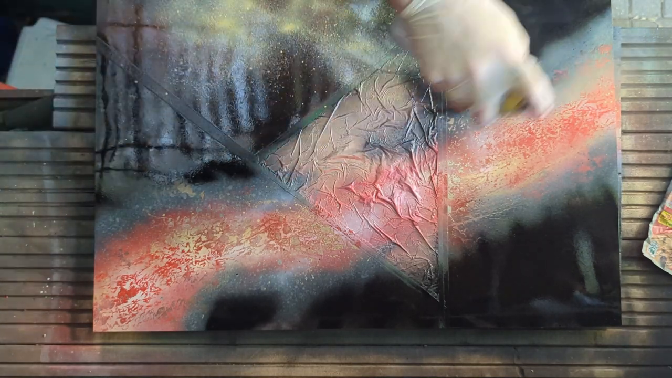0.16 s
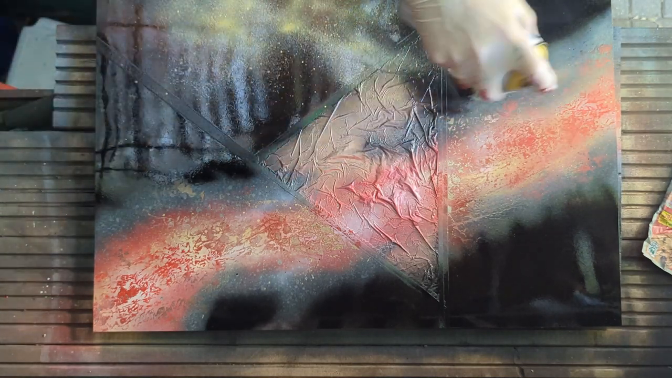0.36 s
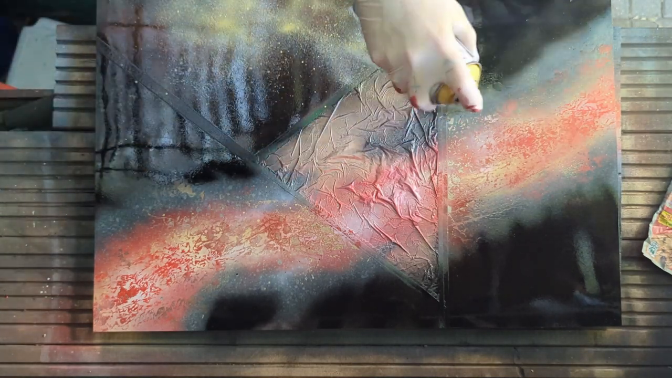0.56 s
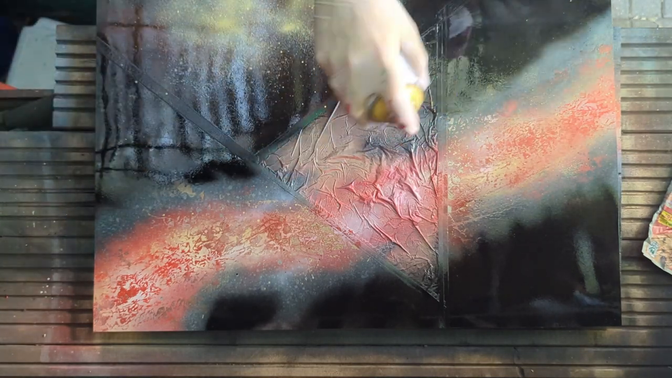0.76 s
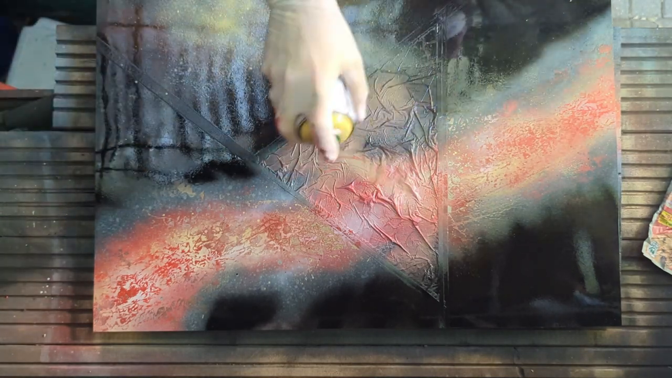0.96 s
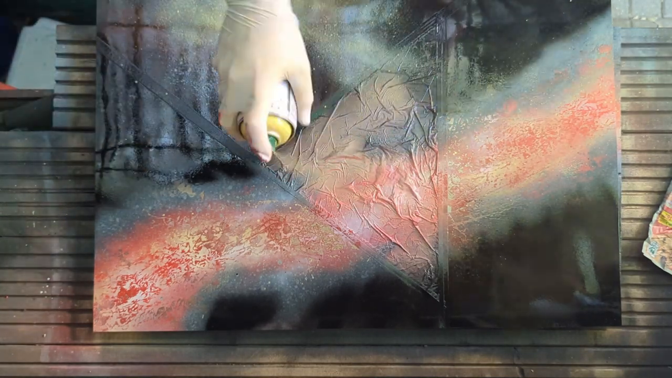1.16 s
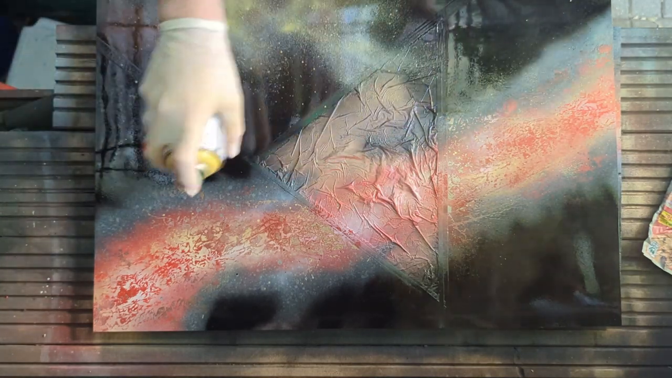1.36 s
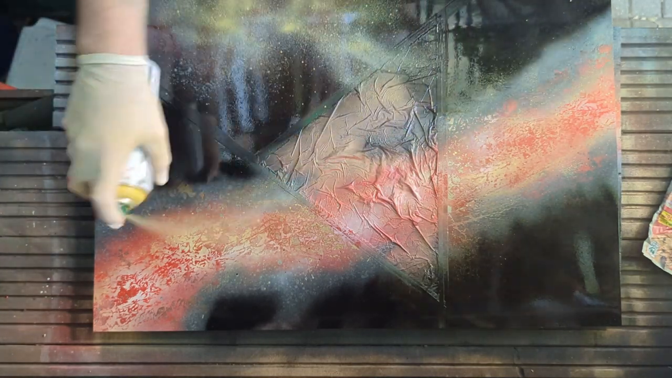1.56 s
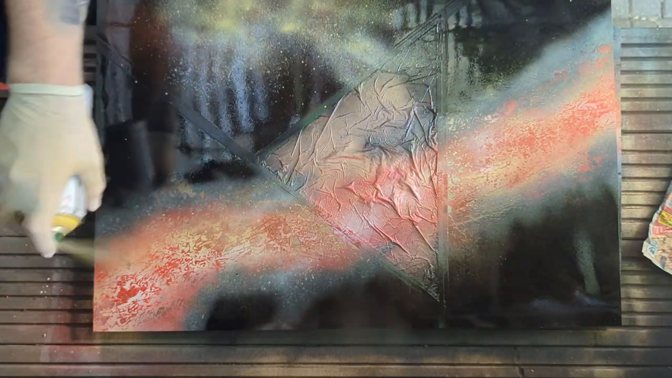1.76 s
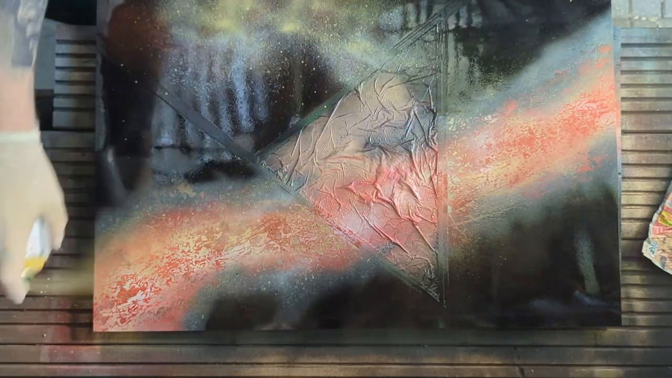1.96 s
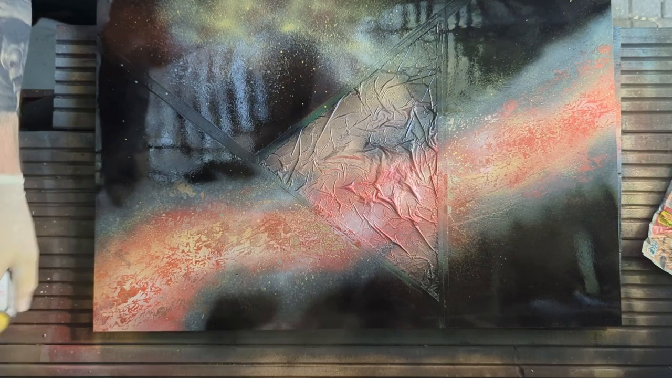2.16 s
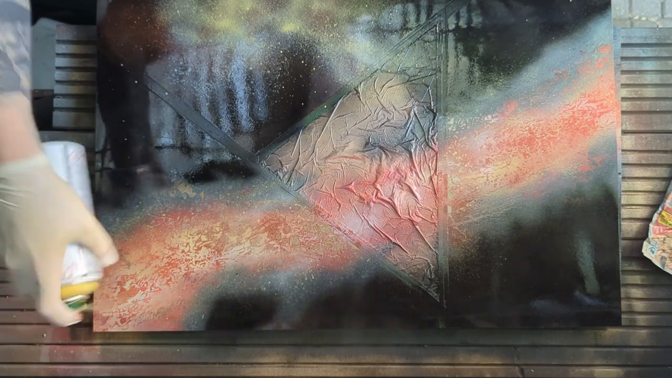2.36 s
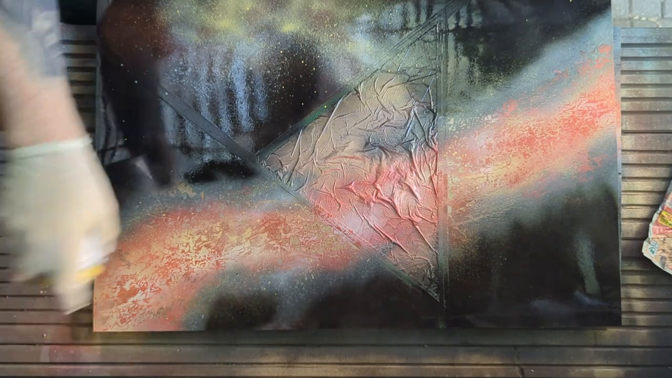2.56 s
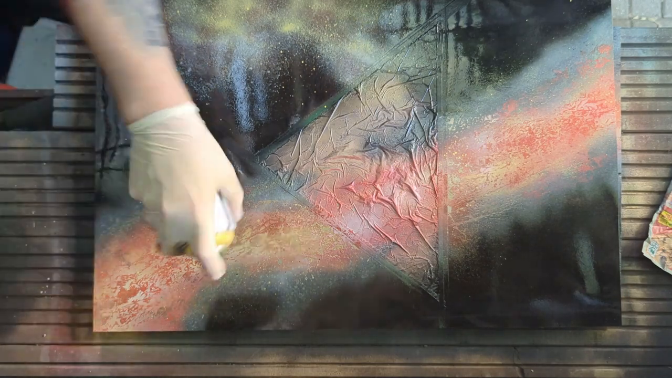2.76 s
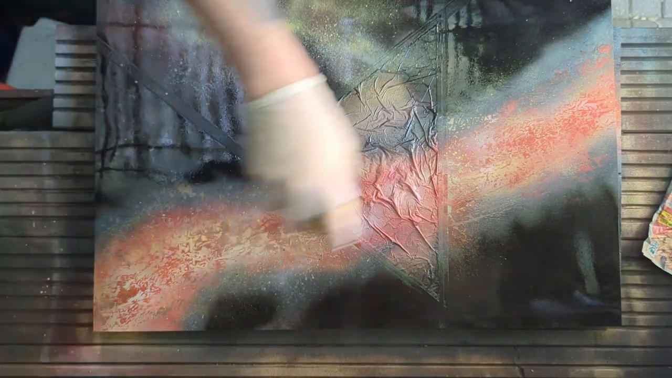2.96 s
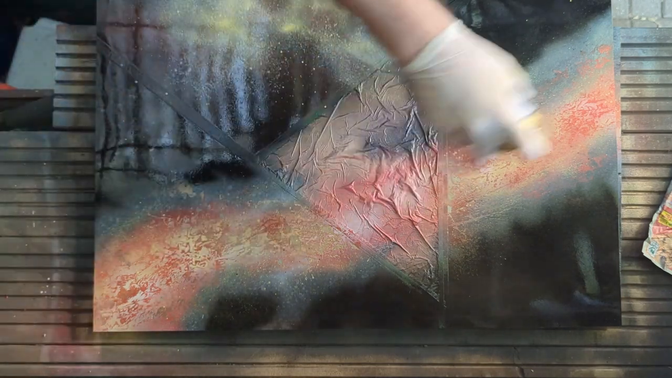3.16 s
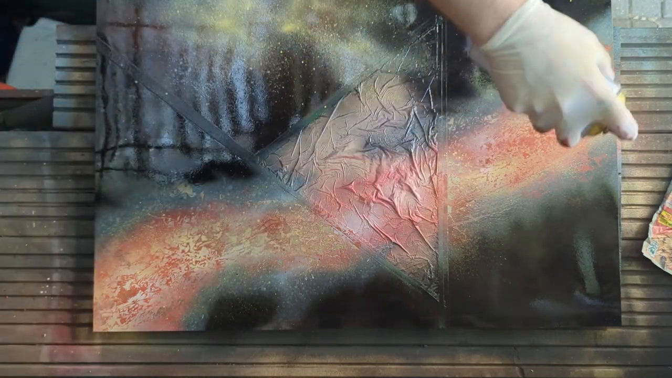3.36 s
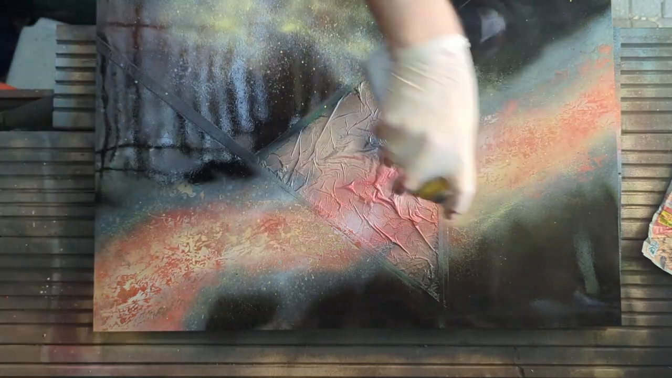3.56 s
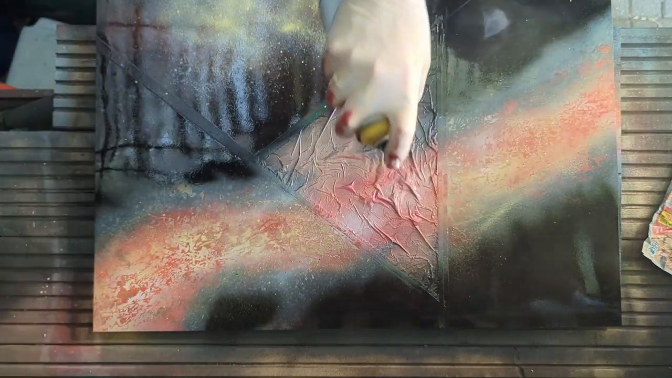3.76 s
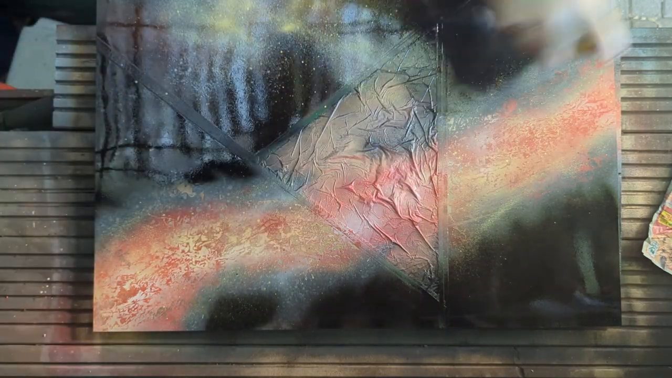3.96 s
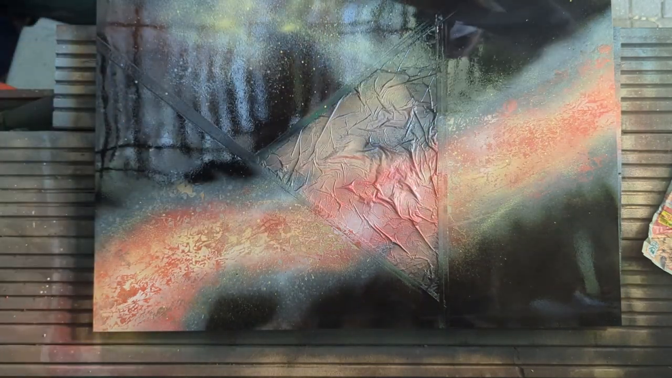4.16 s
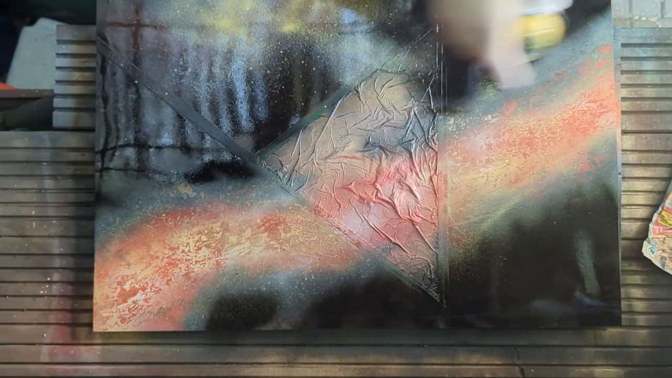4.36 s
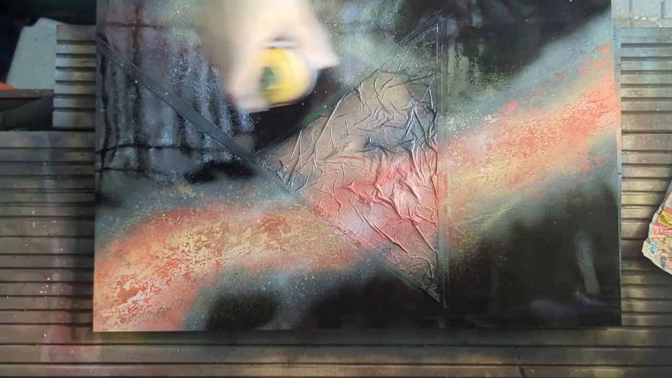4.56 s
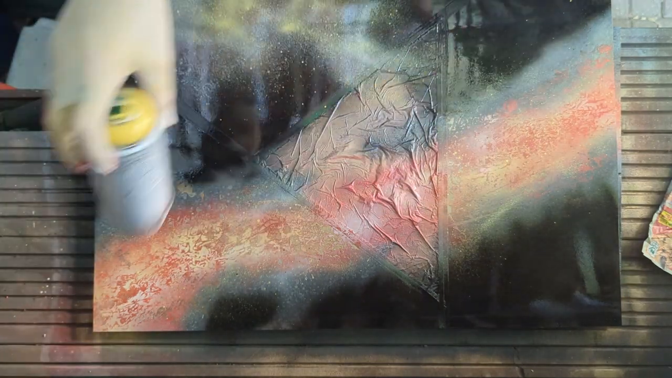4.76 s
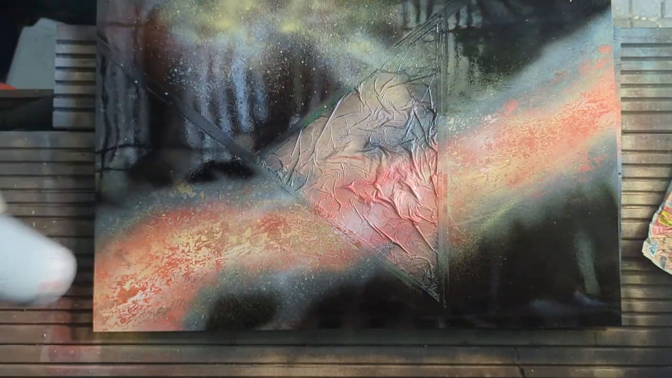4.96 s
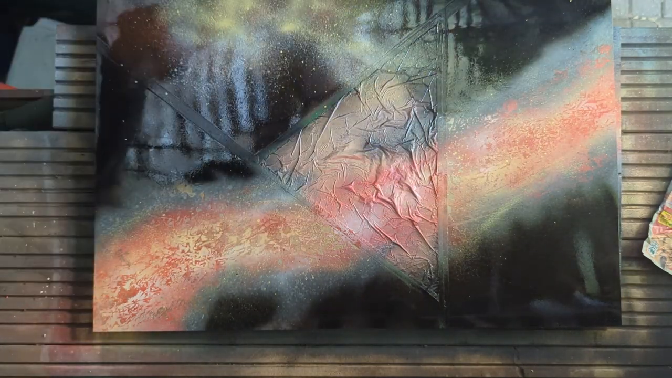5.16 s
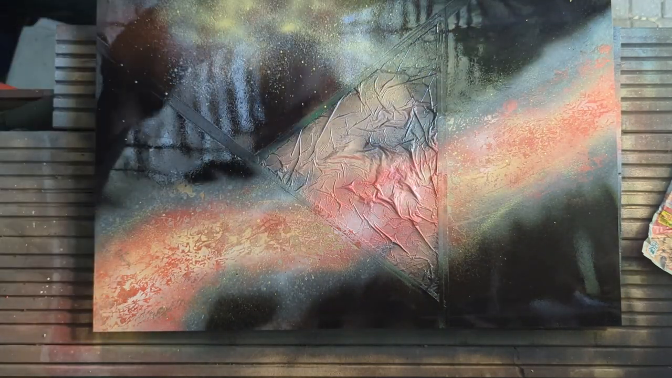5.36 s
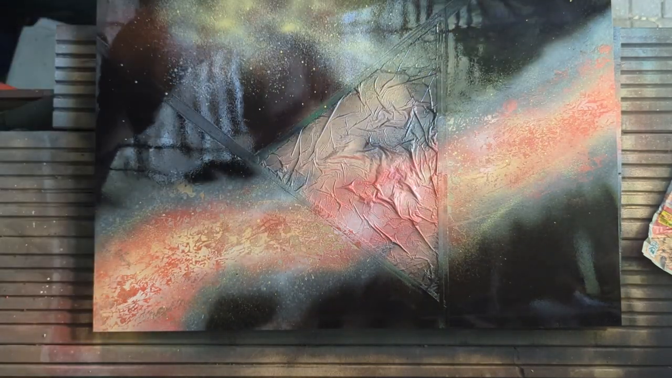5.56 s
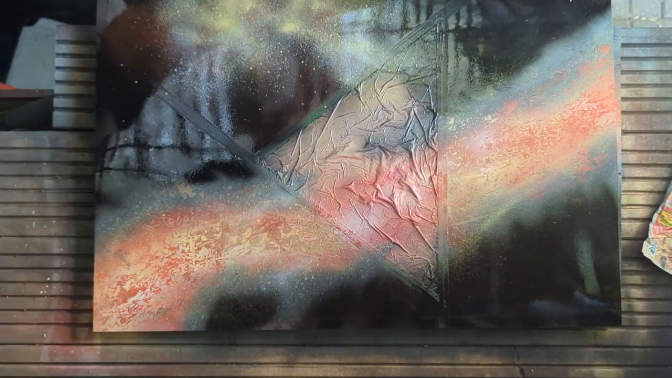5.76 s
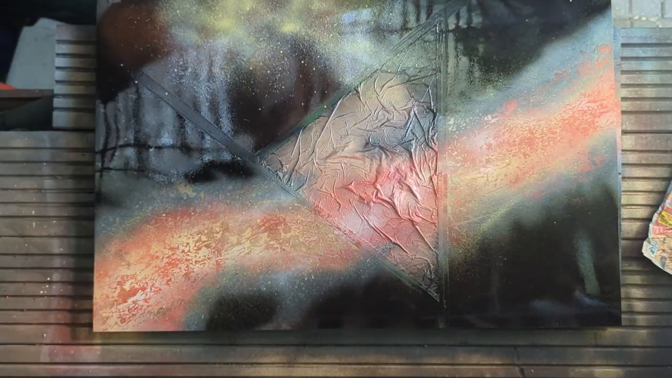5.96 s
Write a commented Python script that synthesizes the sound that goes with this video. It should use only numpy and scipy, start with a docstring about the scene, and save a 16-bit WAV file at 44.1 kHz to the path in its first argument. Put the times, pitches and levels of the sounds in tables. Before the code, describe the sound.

A spray can hisses in short rhythmic bursts over a canvas while its ball rattles, then quiet handling, ending in loud knocks and scraping on wood.

```python
"""A hand sweeps a paint can over a canvas in a small studio, over a steady lumpy rumble of coloured noise.
First come short nozzle bursts of grainy jet noise, while the mixing ball rattles and taps modes of the can.
Then the ball rolls in a gliding resonance, jolts of the can hiss, and cloth rubs and snaps in soft noise.
Last, things drag on the wooden table in wood noise, grit and squeaks, and modal knocks drive it into clipping.
Two soft falling-pitch bumps lie below, one in the spraying and one among the knocks."""
import sys
import numpy as np
from scipy import signal
from scipy.fft import rfft, irfft
from scipy.io import wavfile
from scipy.ndimage import uniform_filter1d, map_coordinates

SR = 44100
rng = np.random.default_rng(int(sys.argv[2]) if len(sys.argv) > 2 else 0)


def wrap_up_sound(samples):
    """Save the sound to the file named by the first command line argument, as 16-bit audio."""
    columns = np.atleast_2d(samples).T
    # keep every value between -1 and 1, then stretch to whole-number steps
    tamed = np.clip(columns, -1, 1)
    steps = np.round(tamed * 32767).astype(np.int16)
    wavfile.write(sys.argv[1], SR, steps)


N = 264600

# Room rumble and hiss. Each row: frequency in Hz, relative density in dB per Hz.
HUM_SPECTRUM = [(12, -56), (20, -35), (47, -7), (68, -5), (93, -6.5), (129, -16), (232, -34), (299, -26),
                (373, -39), (479, -26.5), (536, -36), (2100, -32), (11800, -43.5), (14400, -40),
                (15600, -77)]
# Path of the rumble's low part. Each row: time in seconds, level in dB.
RUMBLE_SWELL = [(0, -41.5), (.99, -42.5), (1.46, -48), (1.55, -42.5), (1.65, -46), (2.32, -49.5),
                (2.75, -45), (2.88, -50), (3.0, -48), (3.45, -46.5), (3.61, -42), (4.0, -46.5), (4.23, -42),
                (4.51, -48), (5.01, -41), (5.14, -49.5), (5.22, -41), (5.45, -51.5)]
# Likeness of left and right. Each row: frequency in Hz, likeness (clipped to 0-1 in use).
LIKENESS = [(60, 0.97), (240, 0.94), (950, 0.08), (3770, -2.2), (15000, -0.04)]
# Reverberation. Each row: frequency in Hz, t60 in seconds.
ROOM_DECAY = [(200, 0.26), (500, 0.13), (1000, 0.15), (4000, 0.19), (12000, 0.18)]
# Where the can is. Each row: time in seconds, lead of the left port in ms, left-right level in dB.
PLACE = [(0, -0.032, -2), (.75, 0.03, -1), (1.25, 0.085, -1), (1.75, 0.2, 0), (2.3, 0.25, 0),
         (2.6, 0.18, 0), (2.9, 0.15, -1), (3.251, -0.088, -1.3), (3.75, -0.07, -0.5), (4.1, -0.05, -2.5),
         (4.751, -0.057, 0), (5.1, 0.37, 2), (5.55, 0.32, 1.5), (5.7, 0.25, 1), (6, 0.13, 3.5)]
# Soft low bumps. Each row: start in seconds, relative level at the onset in dB.
BUMPS = [(2.713, -22), (5.647, -8.5)]
# Cloth rubs and the hiss after jolts of the can. Each row: start, rise and hold in seconds,
# relative level in dB, drift over the hold in dB, brightness 0-1, whistle in dB against the soft noise.
RUBS_AND_JOLTS = [(3.66, 0.055, 0.27, -50, 0.5, 0.1, -40), (3.96, 0.018, 0.064, -23.5, -21, 0.47, -40),
                  (4.05, .01, 0.09, -34.5, -14, .1, -40), (4.17, .01, .07, -54, 1, 0, -40),
                  (4.244, 0.011, .04, -31.5, -13, 0.57, -40), (4.29, .01, .1, -42, -3.5, .4, -40),
                  (4.396, .01, 0.075, -35.5, -11, 0.2, -40), (4.486, 0.01, 0.03, -42, -13, 0.9, -40),
                  (4.53, .01, 0.16, -50.5, -2.5, 0.16, -40), (4.72, 0.06, .16, -41.5, -6, 0.23, -4),
                  (5.14, 0.082, .01, -42, -4, 0.1, -3)]
# Noise of the rubs and jolts before its tilt. Each row: frequency in Hz, relative density in dB per Hz.
SOFT_SPECTRUM = [(350, -58), (600, -24), (1120, -12.5), (1460, -9), (1580, -11), (1760, -2.5), (3630, -8),
                 (4770, -9), (6010, -7.5), (6620, -4.5), (15600, -18.5)]
# The ball rolls along the wall. Each row: start, rise and hold in seconds, relative level in dB,
# drift over the hold in dB, singing pitch in Hz, climb in Hz per second.
ROLLS = [(3.28, 0.019, 0.12, -33, -14, 1390, 0), (4.03, .026, 0.1, -28, -12, 1460, 1500),
         (4.25, 0.011, 0.13, -40, -1, 1450, 1300), (4.394, 0.0092, 0.042, -28.5, -15, 1630, 0),
         (4.47, .01, 0.25, -48, -3, 1330, -200)]
# Slides on the table. Each row: start, rise and hold in seconds, relative level in dB,
# drift over the hold in dB, gain of the gritty treble in dB.
DRAGS = [(5.459, 0.0058, 0.067, -21, 2.5, -11), (5.56, 0.0086, 0.066, -29, 2.5, -7),
         (5.63, 0.0096, .01, -3, -5, -23), (5.75, 0.017, .005, -22, 6, -24),
         (5.765, 0.013, 0.031, 7, -14.5, -30), (5.817, 0.018, 0.084, -11, -12, -10.5),
         (5.9, 0.021, 0.051, -25, -17, -1.5)]
# Shaken wood. Each row: frequency in Hz, relative density in dB per Hz.
WOOD_SPECTRUM = [(24, -46), (40, -41.5), (162, -27), (233, -25), (343, -16), (512, -12), (600, -33),
                 (821, -13), (912, -5), (1410, -7.5), (1510, -8), (1870, -10), (2600, -21.5), (3380, -57),
                 (5720, -120)]
# Grit under the slide. Each row: frequency in Hz, relative density in dB per Hz.
GRIT_SPECTRUM = [(1240, -22), (2100, 5), (3140, -12), (3590, -6), (3880, -5), (4180, -13), (4360, -5),
                 (7980, -10), (8680, -9), (9840, -16), (11900, -11), (14400, -20), (15600, -37)]
# Short squeaks. Each row: start, rise and hold in seconds, relative level in dB, drift over the hold in dB.
SQUEAKS = [(5.459, 0.0044, 0.017, -20, -4.5), (5.49, 0.0067, .002, -14.5, -3), (5.77, .02, .002, -11, -5),
           (5.8, .01, .075, -29, -5), (5.893, 0.017, 0.0054, -10.5, -5), (5.925, .005, .08, -41, -4)]
# Partials of the squeak. Each row: multiple of its pitch, relative level in dB.
SQUEAK_PARTIALS = [(1, 2), (1.62, -20), (2.38, -16.5)]
# Knocks on the table. Each row: time in seconds, relative peak in dB, favoured mode in Hz,
# relative crack in dB, chatter t60 in seconds.
KNOCKS = [(5.46, -17.5, 350, -15, 0.12), (5.489, -20, 900, -3, 0.13), (5.509, -18.5, 497, -13, 0.094),
          (5.632, -14.5, 1200, -2.5, 0.032), (5.636, 6.5, 500, -24, 0.048), (5.642, 1.5, 506, -25, 0.052),
          (5.653, -11, 490, -10, .05), (5.689, -19.5, 640, -13, .059), (5.768, -9, 430, -22, .07),
          (5.777, 2.5, 410, -23.5, 0.041), (5.794, -4, 500, -15, 0.07), (5.83, 5.5, 555, -31, 0.067),
          (5.842, -2.5, 794, -32, 0.1), (5.86, -1, 376, -27, 0.042), (5.878, -14, 355, -11, 0.08),
          (5.896, -13.5, 400, -6.5, 0.16), (5.928, -13, 556, -31, 0.13)]
# Table-top modes. Each row: frequency in Hz, relative level in dB, t60 in seconds.
TABLE_MODES = [(56, -8, 0.39), (124, -22, 0.08), (170, -5, 0.1), (260, -13, 0.062), (349, -3, 0.1),
               (386, -5.5, 0.091), (463, -8, 0.062), (505.4, 7.5, 0.06), (562, -4, 0.09), (642, -7.5, 0.16),
               (737, -3, 0.087), (810, 1, 0.095), (1033, 14.5, 0.023), (1110, -4, 0.043), (1225, 19, 0.021),
               (1380, -2, 0.055), (1630, 12.5, 0.031)]
# Treble of a sharp contact. Each row: frequency in Hz, relative density in dB per Hz.
CRACK_SPECTRUM = [(880, -31), (1500, -7.5), (3730, -11.5), (4590, -7), (5860, -12.5), (8100, -11),
                  (9110, -17.5), (11800, -8), (15600, -22)]
# The ball strikes the can; the last two rows are small snaps of glove or cloth. Each row: time in seconds,
# relative peak in dB, favoured mode in Hz, relative crack in dB, chatter t60 in seconds.
STRIKES_AND_SNAPS = [(.019, -14.5, 2260, 6.5, 0.077), (.084, -21, 2480, -6, .13),
                     (.108, -18.5, 2770, -5, 0.23), (.214, -12, 1150, -12, 0.067),
                     (.258, -15.5, 2080, 3, 0.09), (.348, -16.5, 2790, -15, .12),
                     (.368, -13.5, 1380, -6, 0.064), (.398, -32.5, 1760, 4, 0.11),
                     (.439, -36, 2450, -3, .12), (.455, -8.5, 1720, -10, 0.12), (.502, -20, 2140, 3, 0.15),
                     (.541, -14.5, 1750, -1.5, .15), (.553, -9, 2100, -7, 0.071),
                     (.562, -16, 1100, -15, 0.089), (.603, -8.5, 2780, -14.5, .09),
                     (.678, -10.5, 1800, 0, 0.066), (.72, -9, 2480, -12, .11), (.767, -6, 1300, -16, .079),
                     (.806, -6, 1250, -19, 0.056), (.829, -17, 1200, -2, 0.078),
                     (.864, -22, 2840, -2, 0.067), (.904, -23.5, 2200, -1, .11), (.96, -6, 977, -11, 0.056),
                     (.967, -10.5, 2320, 0, .1), (1.023, -11, 2480, -12.5, 0.067),
                     (1.085, -28, 1410, -6, .12), (1.105, -19, 2220, -2.5, 0.15),
                     (1.163, -15, 2460, -1.5, 0.14), (1.2, -11, 1700, -1.5, 0.13),
                     (1.258, -14, 1190, -13, 0.064), (1.301, -32, 2440, 3.5, 0.097),
                     (1.367, -14, 1700, 1.5, 0.16), (1.401, -13.5, 2340, 1, 0.12),
                     (1.449, -14.5, 1300, -8.5, 0.073), (1.473, -7.5, 1390, -14, .093),
                     (1.509, -17, 1390, -8, 0.13), (1.589, -13.5, 1120, -9, 0.18),
                     (1.602, -9, 2430, -2.5, 0.18), (1.668, -3, 1200, -11.5, 0.084),
                     (1.762, -7.5, 2380, -13, 0.15), (1.775, -15, 2120, 3.5, 0.094),
                     (1.858, -18.5, 2590, -4, 0.16), (1.863, -5, 1390, -12.5, 0.19),
                     (1.961, -34, 2010, -9, 0.11), (1.994, -4.5, 2700, -12.5, 0.094),
                     (1.999, -7.5, 1000, -20, 0.11), (2.072, -5.5, 1200, -18, 0.11),
                     (2.098, -4.5, 1310, -12.5, .13), (2.179, -7, 1350, -1.5, 0.19),
                     (2.25, -6, 1390, -13, 0.091), (2.289, -14, 1110, -15.5, 0.11),
                     (2.421, -5.5, 1050, -7, 0.072), (2.43, -8, 2250, -15, 0.12),
                     (2.445, -0.5, 1010, -12, 0.06), (2.47, -3, 1100, -22, 0.11),
                     (2.488, -4.5, 1010, -25, 0.14), (2.537, -7, 2410, -14.5, 0.15),
                     (2.674, -9.5, 1480, -13, 0.12), (2.708, -5, 1280, -18, 0.15),
                     (2.771, -11.5, 1200, -12, 0.12), (2.807, -19, 1390, 0.5, 0.1),
                     (2.904, -30, 2660, 2, .16), (2.958, -4, 1200, -17.5, 0.13),
                     (2.979, -15.5, 1420, -10, 0.23), (3.054, -19, 2440, 0.5, 0.12),
                     (3.131, -11.5, 1980, -19, 0.068), (3.145, -4, 1950, -19.5, 0.057),
                     (3.227, -10, 1010, -13, 0.058), (3.274, -21, 1800, -20, .088),
                     (3.308, -19.5, 1440, -2.5, 0.096), (3.349, -32.5, 1340, 0.5, 0.17),
                     (3.396, -31.5, 1410, -2.5, .2), (3.482, -24.5, 2050, -13, 0.2),
                     (3.591, -11, 2030, -17, 0.062), (3.61, -19, 2120, -10.5, 0.22),
                     (3.732, -33, 2300, -7, 0.26), (3.881, -33.5, 1850, -20, 0.26),
                     (3.916, -30.5, 1750, -15, 0.16), (3.971, -11, 2490, -2.5, 0.069),
                     (3.988, -12.5, 2200, -2, 0.078), (4.027, -23, 1350, -14, .12),
                     (4.053, -24.5, 1540, -3.5, 0.18), (4.072, -26, 1530, -16, .1),
                     (4.092, -25, 1770, -17, 0.21), (4.142, -30, 1460, -2, 0.15),
                     (4.253, -25, 1440, -2.5, 0.16), (4.404, -19, 1700, -2.5, 0.067),
                     (4.431, -25, 1670, -6, 0.27), (4.495, -29, 1320, 0, .12), (4.885, -35, 2960, 5, 0.062),
                     (5.24, -34.5, 2870, 4.5, 0.14)]
# Small random taps of the ball. Each row: from and to in seconds, taps per second, relative floor in dB.
TICKS = [(0, 2.1, 45, -31), (3.65, 3.95, 20, -44.5), (4.2, 4.65, 10, -42)]
# Can wall, damped by paint and hand. Each row: frequency in Hz, relative level in dB, t60 in seconds.
CAN_MODES = [(667, 6, 0.0071), (905, -49, 0.061), (1010, -23, 0.022), (1110, -2, 0.036), (1200, -2.5, 0.03),
             (1300, 1, 0.013), (1390, 1.5, 0.06), (1500, -16, 0.023), (1720, 2.5, 0.023),
             (1860, 0.5, 0.014), (2080, 6.5, 0.027), (2250, 1, 0.026), (2460, 4, 0.024), (2780, 2.5, 0.03),
             (3300, -0.5, 0.018)]
# Presses of the nozzle. Each row: start, rise and hold in seconds, relative jet level in dB,
# drift over the hold in dB, gain of the lower hiss in dB, gain of the rush on the canvas in dB.
BURSTS = [(-.02, 0.018, 0.034, -24, 4.5, 4, 2), (.155, 0.022, .14, -26.5, 5.5, 3.5, -1.5),
          (.405, 0.03, 0.11, -25, 1.5, 0.5, -1), (.625, 0.036, 0.093, -22, -4.5, -1, 0),
          (.875, .03, 0.14, -23, -3, -1.5, -1.5), (1.1, 0.054, 0.088, -20.5, -3.5, 0, -1),
          (1.5, 0.018, 0.14, -22.5, 0, -3.5, 1), (1.735, 0.022, 0.12, -22, -0.5, 3.5, 1),
          (1.92, .035, 0.12, -20, -3, -0.5, 3), (2.405, 0.021, 0.12, -19.5, -3, 1.5, 5.5),
          (2.665, 0.02, 0.12, -22, -0.5, 1.5, 2), (3.125, 0.032, 0.13, -22.5, -3.5, 0.5, -2.5),
          (3.465, 0.051, .12, -23.5, -1.5, 0.5, -5)]
# Jet hiss. Each row: frequency in Hz, relative density in dB per Hz.
JET_SPECTRUM = [(180, -66.5), (300, -28.5), (796, -16.5), (1050, -11.5), (1350, -10.5), (2840, -7.5),
                (4020, -12.5), (4990, -6.5), (5510, -10.5), (8200, -2.5), (9830, -6.5), (12000, 3),
                (15600, -0.5)]
# Dull rush where the spray lands. Each row: frequency in Hz, relative density in dB per Hz.
CANVAS_SPECTRUM = [(90, -32), (160, 1.5), (250, -2.5), (450, -6), (650, 6.5), (1000, -32)]

HUM_DB = -44.5
BUMP_HZ, BUMP_T60_S = 120, 0.02
WHISTLE_HZ, WHISTLE_SAG_HZ_PER_S, WHISTLE_FROM_S = 4900, 900, 4.76  # pitch reached at that moment
SQUEAK_HZ = 1856
CANVAS_DB = -31  # base level against the jet
# For each gesture: how far below its level the rise begins, and how fast it dies.
SOFT_FOOT_DB, SOFT_FADE_DB_PER_S = 19, 260
ROLL_FOOT_DB, ROLL_FADE_DB_PER_S = 12, 500
DRAG_FOOT_DB, DRAG_FADE_DB_PER_S = 13.5, 600
SQUEAK_FOOT_DB, SQUEAK_FADE_DB_PER_S = 28, 1300
VALVE_FOOT_DB, VALVE_SHUT_DB_PER_S = 25.5, 600
CLIP_LEVEL, EDGE_HZ = .98, 15700


def amp(db):
    """Turns dB into gain."""
    return 10 ** (np.asarray(db) / 20)


def evened(x):
    """Brings x to rms 1."""
    return x / np.sqrt(np.mean(x ** 2) + 1e-20)


def read(points, hz):
    """Reads a curve between its points on a logarithmic frequency axis."""
    f, value = np.transpose(points)
    return np.interp(np.log(hz + 1), np.log(f + 1), value)


def add(mix, s, sound):
    """Lays a sound into the mix at s seconds, cut at the end."""
    part = mix[..., round(s * SR):][..., :sound.shape[-1]]
    part += sound[..., :part.shape[-1]]


def coloured(x, points, tilt_db=0):
    """Gives x a spectrum, tilted in dB per octave about 5 kHz, at rms 1."""
    hz = np.fft.rfftfreq(x.shape[-1], 1 / SR)
    gain_db = read(points, hz) + tilt_db * np.log2((hz + 50) / 5000)
    return evened(irfft(rfft(x) * amp(gain_db), x.shape[-1]))


def grainy(rough_db, size):
    """Noise whose level wanders at random over about size samples."""
    wander = evened(uniform_filter1d(rng.standard_normal(N), size))
    return rng.standard_normal(N) * amp(rough_db * wander)


def gestures(rows, foot_db, fade_db_per_s):
    """Rise, drifting hold and fade of each row: the summed gain, and the loudest row at each sample."""
    start, rise, hold, level_db, drift_db = np.array(rows).T[:5, :, None]
    t = np.arange(N) / SR - start
    rise, hold = np.maximum(rise, .001), np.maximum(hold, .001)
    shape_db = drift_db * np.clip((t - rise) / hold, 0, 1)
    shape_db -= foot_db * np.clip(1 - t / rise, 0, 1)
    shape_db -= fade_db_per_s * np.maximum(t - rise - hold, 0)
    gain = amp(level_db + shape_db) * (t >= 0)
    return np.sqrt((gain ** 2).sum(0)), np.array(rows)[gain.argmax(0)].T


def sung(hz, width_hz):
    """Rough contact noise heard through one gliding resonance."""
    turn = np.exp(2j * np.pi * np.cumsum(hz) / SR)
    r = np.exp(-np.pi * width_hz / SR)
    # shift the resonance down to 0 Hz, filter with a double pole, shift back
    still = signal.lfilter([1], np.convolve([1, -r], [1, -r]), grainy(5.0, size=150) / turn)
    return evened((turn * still).real)


def partly_alike(left, other, hz_likeness):
    """Makes a pair whose right side shares the given part of the left."""
    return np.array([left, hz_likeness * left + np.sqrt(1 - hz_likeness ** 2) * other])


def hum():
    """Lumpy rumble over faint hiss, near mono in the bass."""
    left, other = rfft(rng.standard_normal((2, N)))
    likeness = np.clip(read(LIKENESS, np.fft.rfftfreq(N, 1 / SR)), 0, 1)
    x = amp(HUM_DB) * coloured(irfft(partly_alike(left, other, likeness), N), HUM_SPECTRUM)
    low = signal.sosfiltfilt(signal.butter(2, 180, fs=SR, output="sos"), x)
    swell_db = np.interp(np.arange(N) / SR, *np.transpose(RUMBLE_SWELL))
    return x + (amp(swell_db - HUM_DB) - 1) * low


def room(x):
    """Sparse taps of random sign, each band dying at its own speed; long waves reach both ports alike."""
    taps = np.zeros((2, SR // 2))
    at = np.arange(100, SR // 2 - 20, 20) + rng.integers(0, 20, (2, (SR // 2 - 101) // 20))
    np.put_along_axis(taps, at, rng.choice([-1., 1.], at.shape), 1)
    hz, t, bands = signal.stft(taps, SR, nperseg=256)
    likeness = np.clip(read(LIKENESS, hz), 0, 1)[:, None]
    bands = partly_alike(bands[0], bands[1], likeness)
    decay = amp(-60 * t / read(ROOM_DECAY, hz)[:, None])
    tail = signal.istft(bands * decay, SR, nperseg=256)[1]
    return signal.fftconvolve(x[None], tail / np.linalg.norm(tail[0]), axes=1)[:, :N]


def ports(x):
    """The sound reaches the nearer of the two microphone ports first."""
    s, *columns = np.transpose(PLACE)
    n = np.arange(N)
    lead_ms, pan_db = (np.interp(n / SR, s, column) for column in columns)
    heard = []
    for port, side in enumerate((1, -1)):
        read_at = n + side * lead_ms * SR / 2000  # half the lead to each port
        heard.append(amp(side * pan_db / 2) * map_coordinates(x[port], [read_at], order=3))
    return np.array(heard)


def thump():
    """A couple of low cycles that fall in pitch and die."""
    t, out = np.arange(SR // 4) / SR, np.zeros(N)
    turns = BUMP_HZ * t * (1 + 0.93 * np.exp(-t / 0.0073))
    for s, db in BUMPS:
        add(out, s, amp(db - 60 * t / BUMP_T60_S) * np.sin(2 * np.pi * turns))
    return out


def rubs_and_jolt_hiss():
    """Cloth rubs and the hiss after jolts, a blend of dull and bright noise; the last ones whistle, sinking."""
    level, row = gestures(RUBS_AND_JOLTS, SOFT_FOOT_DB, SOFT_FADE_DB_PER_S)
    noise, bright = grainy(2.2, size=200), np.clip(row[5], 0, 1)
    since = np.arange(N) / SR - WHISTLE_FROM_S
    whistle = sung(WHISTLE_HZ - WHISTLE_SAG_HZ_PER_S * since, width_hz=1000)
    dull_part = (1 - bright) * coloured(noise, SOFT_SPECTRUM, -2.2)
    bright_part = bright * coloured(noise, SOFT_SPECTRUM, 5.3)
    return level * (dull_part + bright_part + amp(row[6]) * whistle)


def drag():
    """Stick and slip shake the wood, grit hisses on top, a few thin modes squeak."""
    level, slide = gestures(DRAGS, DRAG_FOOT_DB, DRAG_FADE_DB_PER_S)
    wood = level * amp(-10.0) * coloured(grainy(4.0, size=300), WOOD_SPECTRUM)
    grit = level * amp(slide[5]) * coloured(grainy(1.2, size=100), GRIT_SPECTRUM)
    # the squeak wavers in pitch and level
    waver = evened(uniform_filter1d(rng.standard_normal((2, N)), size=300))
    turns = np.cumsum(SQUEAK_HZ * (1 + 0.016 * waver[0])) / SR
    tone = sum(amp(db) * np.sin(2 * np.pi * k * turns) for k, db in SQUEAK_PARTIALS)
    squeak_level = gestures(SQUEAKS, SQUEAK_FOOT_DB, SQUEAK_FADE_DB_PER_S)[0]
    return wood + grit + np.sqrt(2) * squeak_level * amp(1.5 * waver[1]) * tone


def blows(events, modes, focus, loose, wide, chatter_db, crack_db, crack_hz, trim_db, thin_hz, size):
    """A contact and its dying chatter ring all modes, most those near where it lands, and crack in the treble.

    focus: dB lost per octave from the favoured mode; loose: detuning; wide: phase spread between ports;
    size: samples a mode rings."""
    out, t = np.zeros((2, N)), np.arange(6000) / SR
    hz, db, t60 = np.transpose(modes)[:, :, None]
    fading = amp(db - 60 * t[:size] / t60)
    chance = rng.standard_normal((len(events), 3 * len(modes)))
    noise = rng.standard_normal((len(events), 3, len(t)))
    # each crack has a treble bump at its own pitch
    centre_hz, bins = crack_hz * 2 ** (0.41 * chance[:, :1, None]), np.fft.rfftfreq(len(t), 1 / SR)
    bump_db = 5.0 * np.exp(-(np.log2((bins + 1) / centre_hz) / 0.29) ** 2)
    hiss = irfft(rfft(noise[:, 1:]) * amp(read(CRACK_SPECTRUM, bins) + bump_db), len(t))
    end = signal.windows.tukey(2 * len(t), .3)[len(t):]
    for event, draw, shake, fizz in zip(events, chance, noise[:, 0], hiss):
        s, peak_db, near_hz, treble_db, chatter_t60 = event
        detune, spread, slant = draw.reshape(3, -1, 1)
        weight_db = 2.2 * spread - focus * np.minimum(abs(np.log2(hz / near_hz)), 1.2)
        swing = amp(weight_db) * fading * np.exp(2j * np.pi * hz * (1 + loose * detune) * t[:size])
        # each mode radiates from another patch, so the ports hear it at different phases
        ring = (np.exp(1j * wide * np.outer([1, -1], slant)) @ swing).imag
        dying = amp(-60 * t / np.clip(chatter_t60, .02, .4))
        chatter = amp(chatter_db) * dying * shake ** 3  # cubed noise is spiky like rebounds
        force = chatter + (t == 0)
        ring = signal.fftconvolve(force[None], ring, axes=1)[:, :len(t)]
        crack_fade = dying + 0.97 * amp(-60 * t / 0.036)
        crack = amp(treble_db + crack_db) * crack_fade * evened(fizz[0] + 5.4 * fizz)
        add(out, s - .0003, amp(peak_db + trim_db) * end * (ring / abs(ring).max() + crack))
    # too small a body to radiate deep bass
    return signal.sosfilt(signal.butter(4, thin_hz, "high", fs=SR, output="sos"), out)


def table_knocks():
    """Knocks ring the modes of the wooden table top."""
    return blows(KNOCKS, TABLE_MODES, focus=14.6, loose=.01, wide=0.6, chatter_db=-34.0, crack_db=-8.5,
                 crack_hz=3140, trim_db=6.0, thin_hz=62.0, size=6000)


def roll():
    """The ball sings in the wall as it rolls."""
    level, row = gestures(ROLLS, ROLL_FOOT_DB, ROLL_FADE_DB_PER_S)
    since = np.clip(np.arange(N) / SR - row[0], 0, .3)
    return amp(-4.5) * level * sung(row[5] + row[6] * since, width_hz=280)


def ticks():
    """Small taps of the ball at random moments, sizes and places."""
    rows = []
    for start, stop, per_s, db in TICKS:
        for when, strength, place in rng.random((round(per_s * (stop - start)), 3)):
            s = start + (stop - start) * when
            rows.append((s, db + 8 * strength, 1000 + 1800 * place, -4.5, .1))
    return rows


def ball_and_snaps():
    """Strikes and taps of the mixing ball ring the damped can wall; two small snaps borrow the same modes."""
    return blows(STRIKES_AND_SNAPS + ticks(), CAN_MODES, focus=7.6, loose=0.034, wide=0.68, chatter_db=-33.5,
                 crack_db=-5.5, crack_hz=4740, trim_db=-1.5, thin_hz=766, size=2200)


def spray():
    """Turbulent jet: bright hiss, a lower part with its own gain, spitting droplets, a rush on the canvas."""
    core, *edge = (grainy(2.8, size=40) for part in range(3))
    # the plume is wide, so the ports share only part of it
    jet = coloured(core + 2.0 * np.array(edge), JET_SPECTRUM)
    low = signal.sosfilt(signal.butter(2, 8000, fs=SR, output="sos"), jet)
    level, press = gestures(BURSTS, VALVE_FOOT_DB, VALVE_SHUT_DB_PER_S)
    rush = amp(CANVAS_DB + press[6]) * coloured(grainy(4.5, size=600), CANVAS_SPECTRUM)
    fuller = (amp(press[5]) - 1) * low
    return amp(1.0) * uniform_filter1d(level, size=90) * (jet + rush + fuller)


def scene():
    """Places the sources before the two ports, with the room and the hum around them."""
    strikes = ball_and_snaps()
    knocks = table_knocks()
    soft = rubs_and_jolt_hiss() + roll()
    steady = spray() + soft + thump()
    table = knocks + drag()
    to_room = amp(-2.5) * steady[0] + amp(-5) * strikes[0] + amp(-3.5) * table[0]
    return ports(steady + strikes + table) + room(to_room) + hum()


def record(dry):
    """The right port is brighter at the top; loud knocks clip; then the band limit."""
    hz = np.fft.rfftfreq(N, 1 / SR)
    tilt_db = np.array([[-1.2], [1.2]]) * read([(8000, 0.063), (12000, 0.41)], hz)
    x = irfft(rfft(dry) * amp(tilt_db), N)
    x = np.clip(x, -CLIP_LEVEL, CLIP_LEVEL)
    band_limit = signal.firwin(511, EDGE_HZ, window=("kaiser", 9), fs=SR)
    return signal.oaconvolve(x, band_limit[None], "same")


dry = scene()
out = record(dry)
wrap_up_sound(out)
```